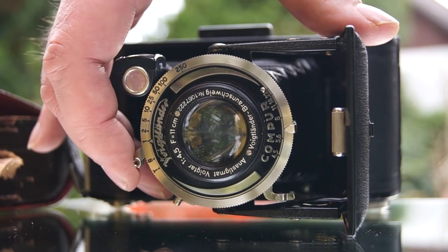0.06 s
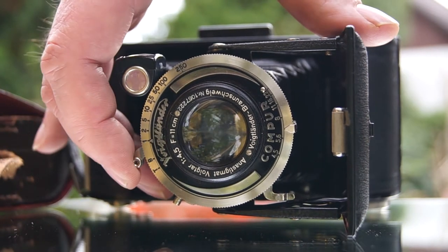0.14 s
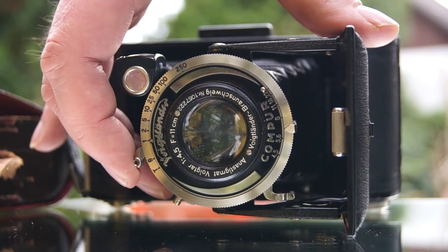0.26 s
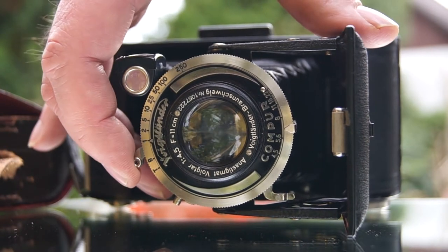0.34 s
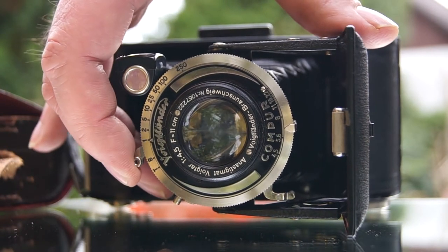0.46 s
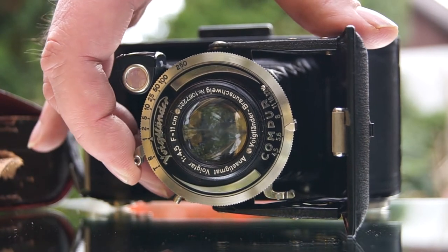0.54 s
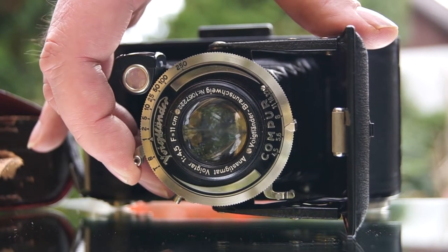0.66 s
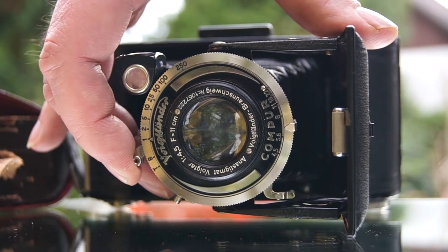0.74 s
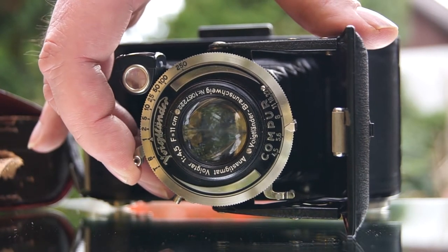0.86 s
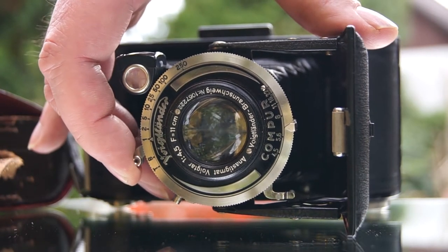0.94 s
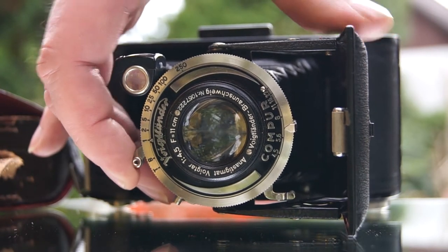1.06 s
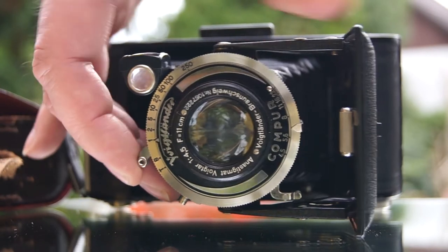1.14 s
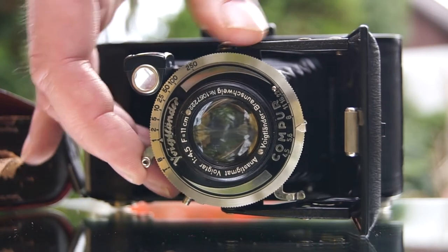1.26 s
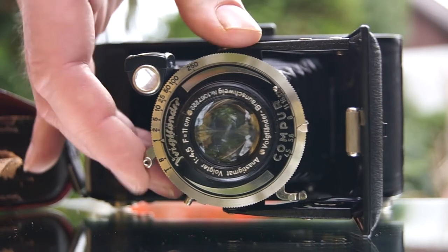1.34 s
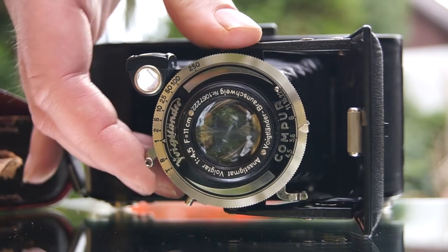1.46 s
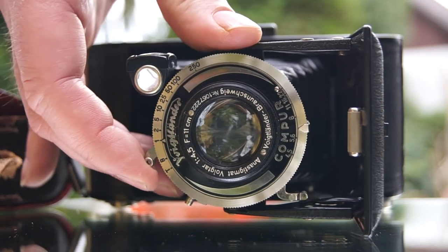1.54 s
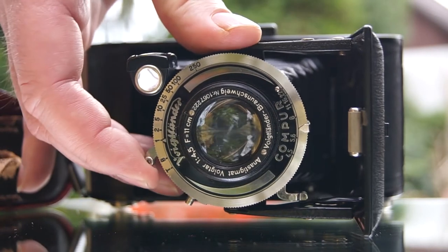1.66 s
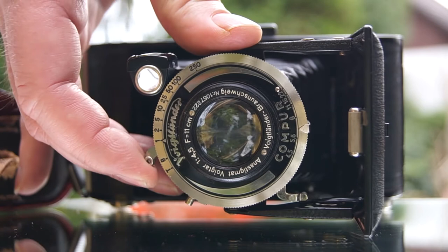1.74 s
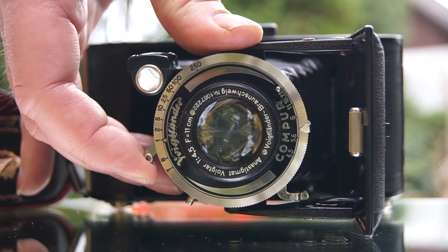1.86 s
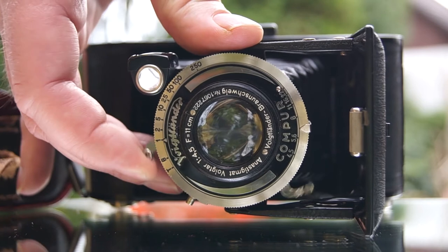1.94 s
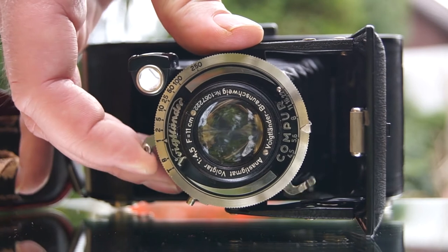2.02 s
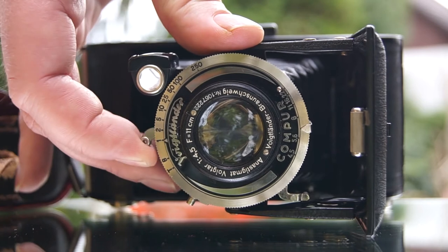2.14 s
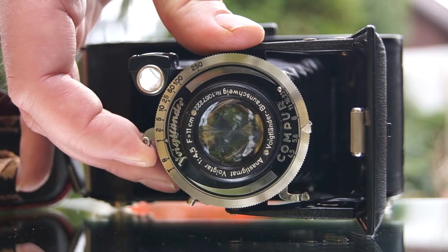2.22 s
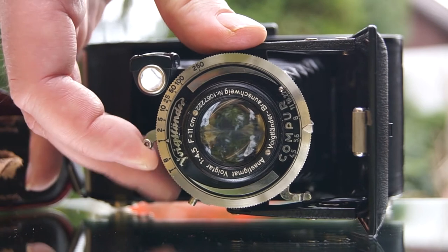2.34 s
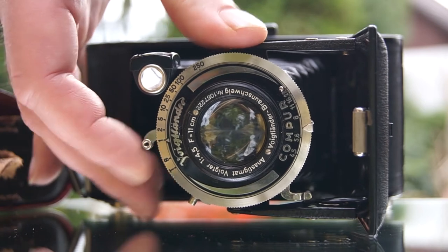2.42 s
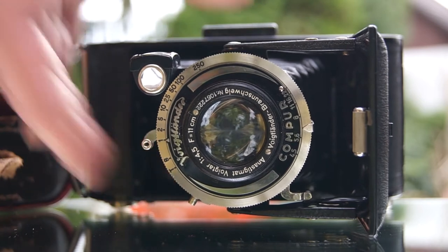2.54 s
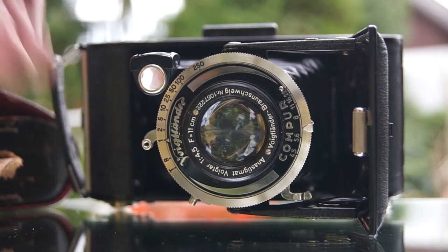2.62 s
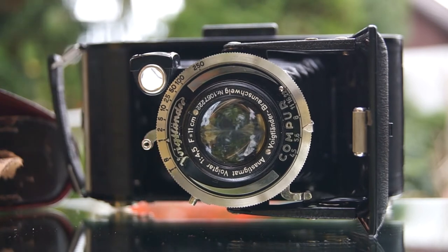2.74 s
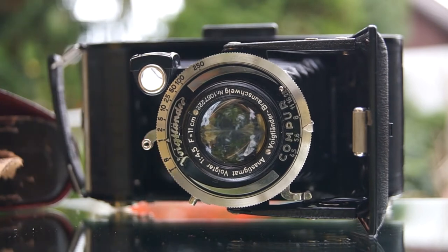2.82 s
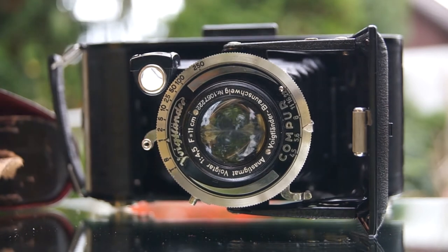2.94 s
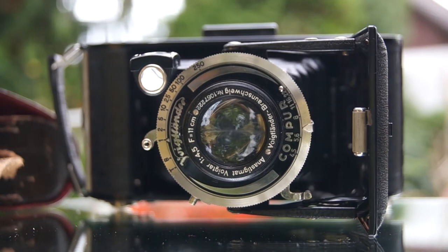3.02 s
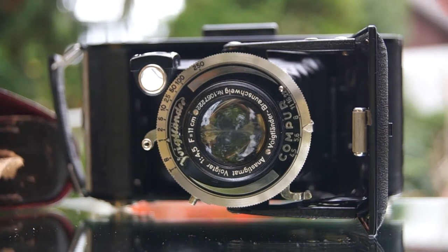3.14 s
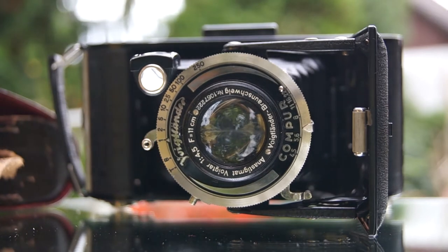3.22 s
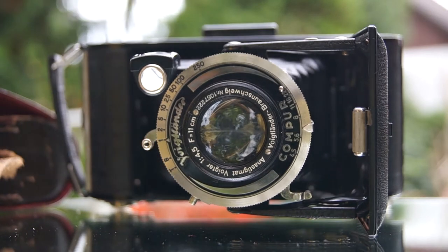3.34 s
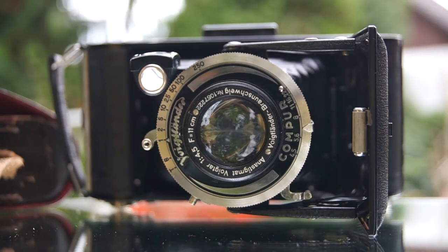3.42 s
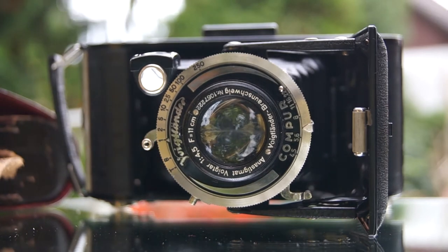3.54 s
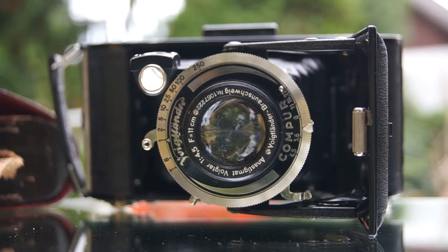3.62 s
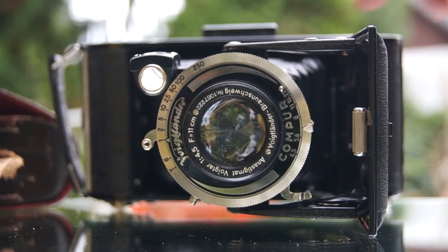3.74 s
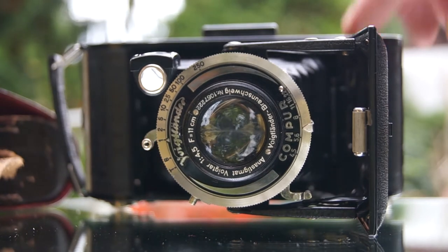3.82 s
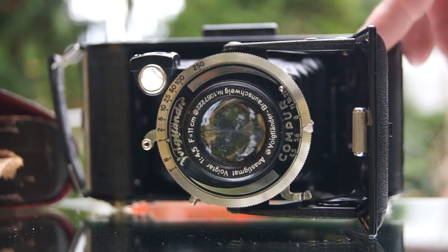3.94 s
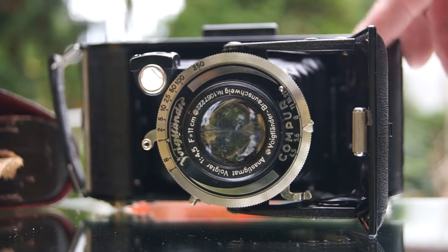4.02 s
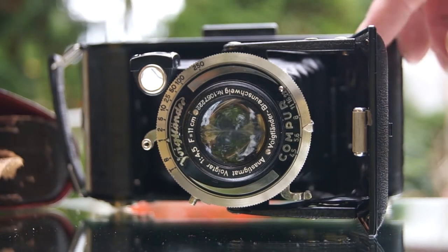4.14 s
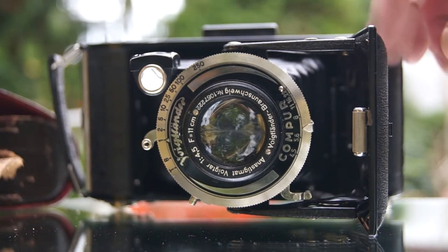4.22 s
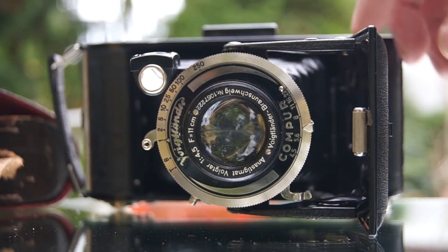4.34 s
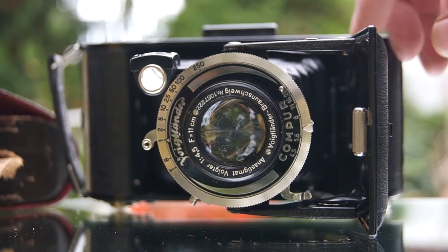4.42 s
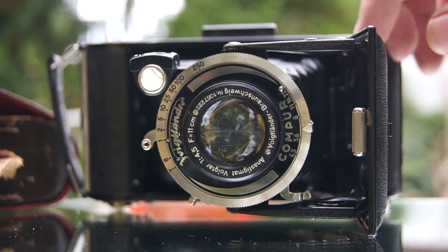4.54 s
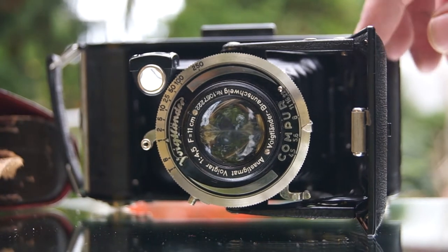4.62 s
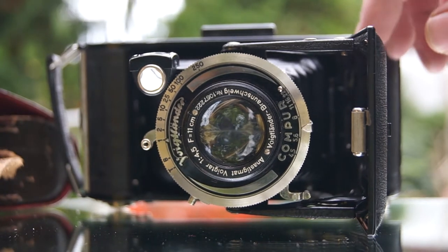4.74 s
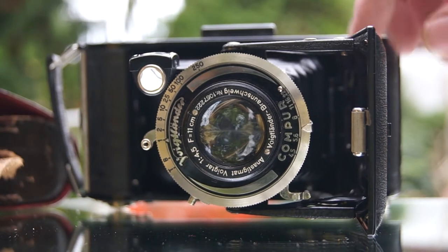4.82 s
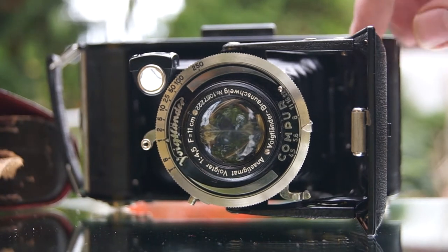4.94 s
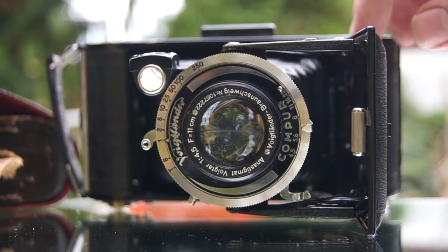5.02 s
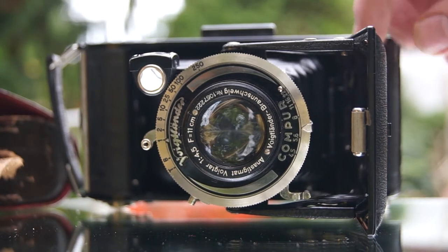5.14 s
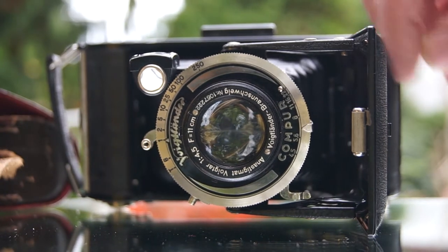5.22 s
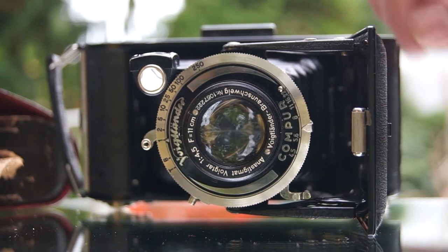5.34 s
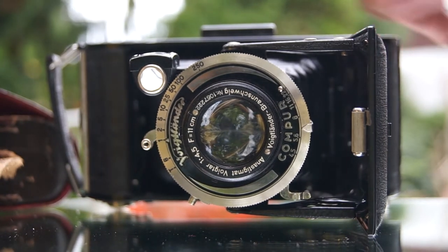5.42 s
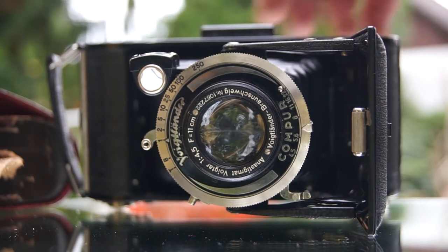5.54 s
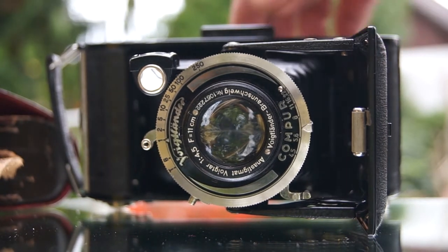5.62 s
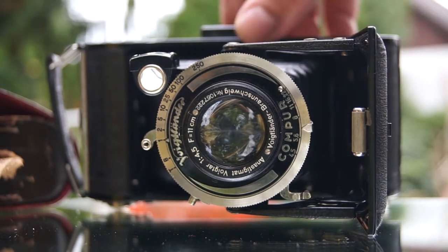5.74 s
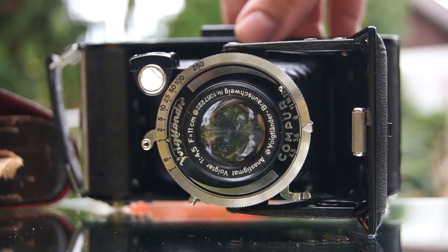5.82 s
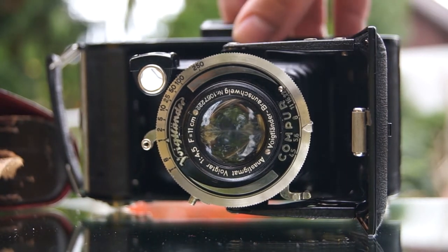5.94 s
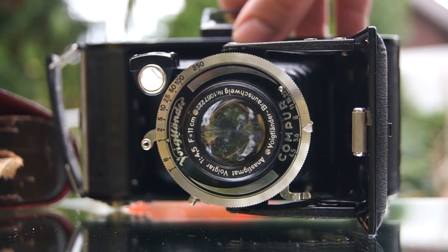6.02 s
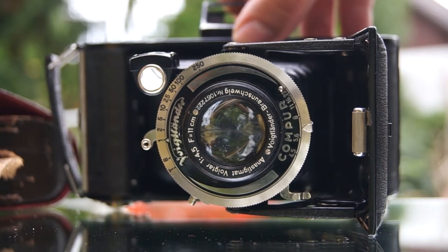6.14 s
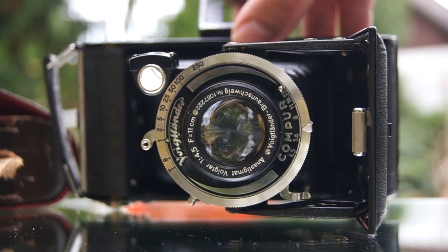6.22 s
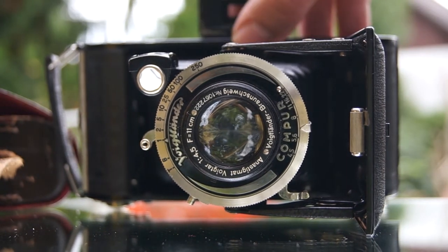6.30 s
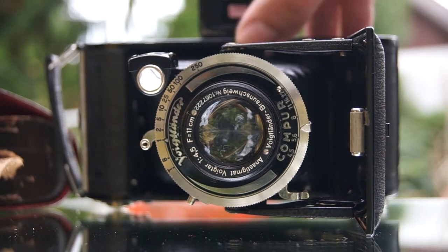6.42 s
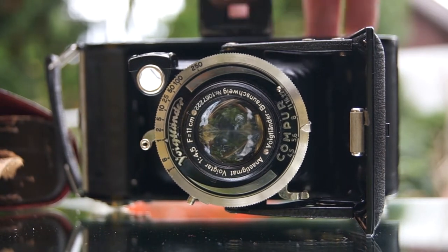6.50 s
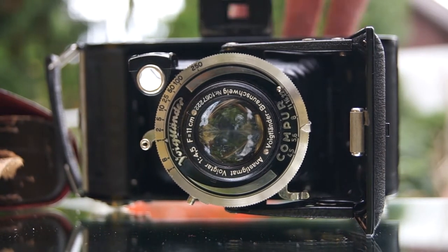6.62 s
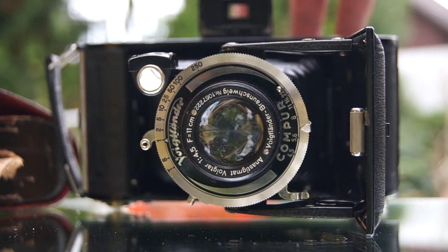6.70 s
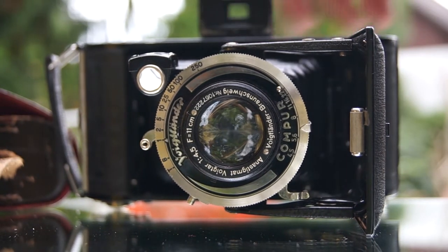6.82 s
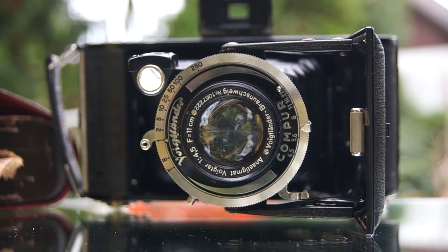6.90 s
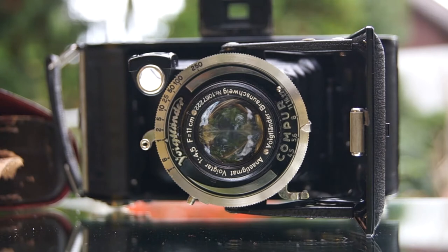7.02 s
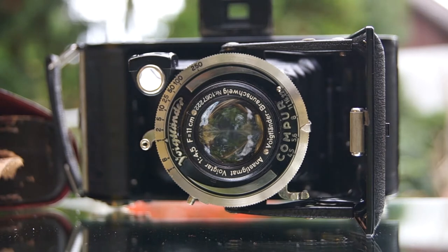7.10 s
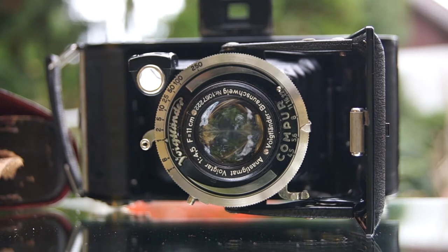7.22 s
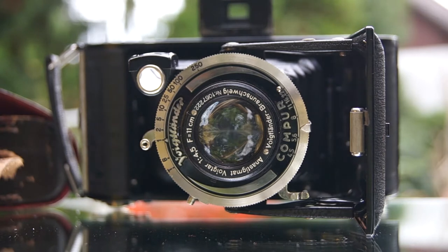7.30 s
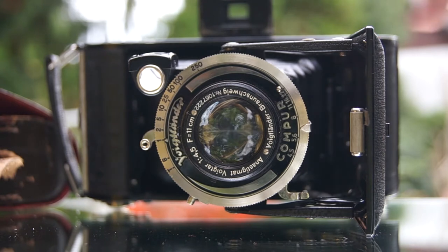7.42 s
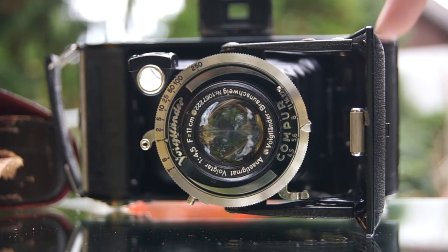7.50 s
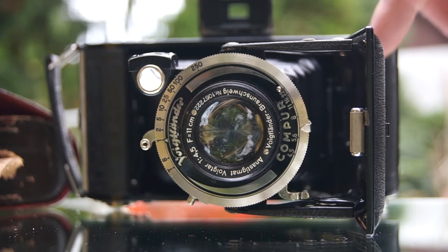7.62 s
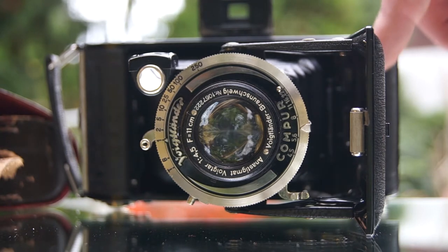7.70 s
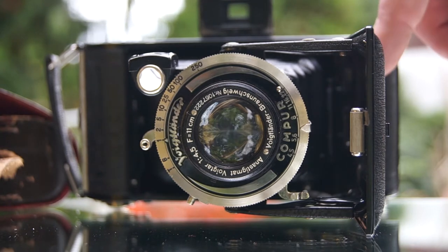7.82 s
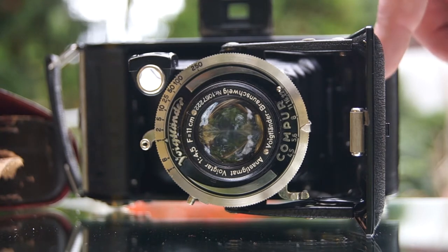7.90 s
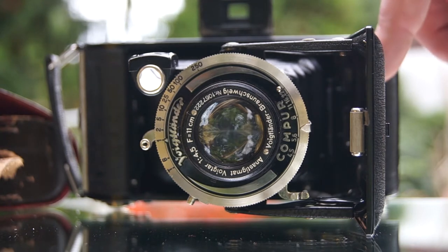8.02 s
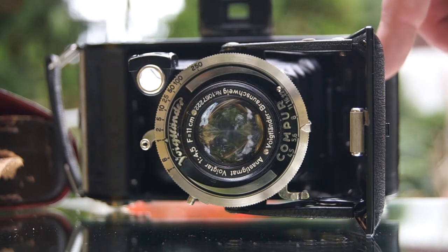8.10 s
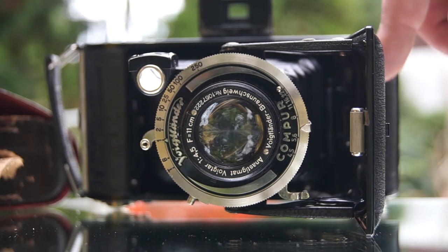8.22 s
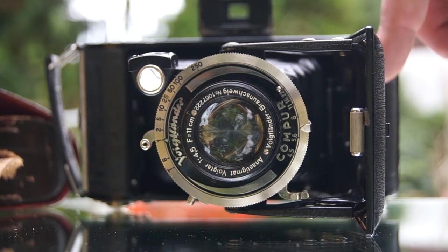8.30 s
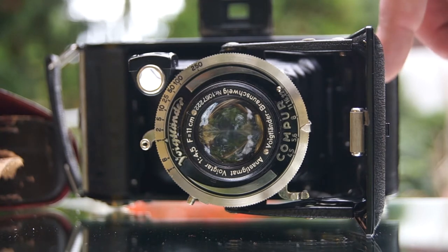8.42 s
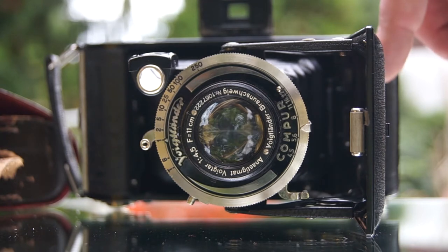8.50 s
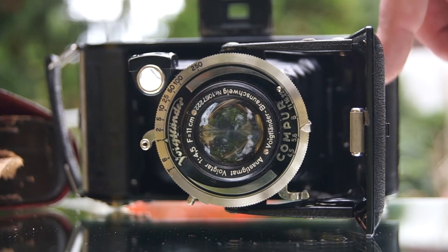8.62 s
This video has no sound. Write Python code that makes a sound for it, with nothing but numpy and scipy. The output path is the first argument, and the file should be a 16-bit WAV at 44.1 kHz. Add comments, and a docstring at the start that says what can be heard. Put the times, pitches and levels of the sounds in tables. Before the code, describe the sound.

A steady, soft, mostly low-to-mid rush of outdoor air and distant traffic runs for about 8.6 seconds, gently wavering, with a barely audible flutter of fine ticks beneath. Close by, an old folding camera is handled: a faint tick at 0.6 s and light taps around 1.3 s. At 2.15-2.2 s the lever cocks with a crisp metallic double click; a very faint, thin, high far peep follows at 2.7 s. A soft tap comes at 3.05 s, then clustered finger ticks and rubs at 3.9-4.4 s, with dull wind buffets on the right, strongest near 4 s. At 5.27 s the shutter snaps, sharp, bright and dry. Around 6.3 s the folding finder springs open with the loudest clack, hollow and metallic, rattling quickly until about 6.5 s with a faint spring ring. Then only the rush, small right-side gusts and a slight finger rub at 7.3 s remain.

```python
"""A garden table: an old folding camera is handled in the steady whirring rush of outdoor air and far traffic.
The shutter lever is cocked with a double click, fingers tap the body, the shutter snaps, and the folding finder
springs open and rattles: noise bursts crack and decaying sine modes ring. Shaped noise makes the rush and the
rubbing fingers; small gusts buffet the right microphone port. Soft ticks near 3 kHz and one thin far peep lie
beneath; narrow bands of the low rush waver irregularly in level."""
import sys
import numpy as np
from scipy import signal
from scipy.fft import rfft, irfft
from scipy.io import wavfile

SR = 44100
rng = np.random.default_rng(int(sys.argv[2]) if len(sys.argv) > 2 else 0)


def store_pcm(level_fs):
    """Save levels as 16-bit WAV."""
    pcm = np.round(np.clip(level_fs, -1, 1) * 32767).astype(np.int16)
    wavfile.write(sys.argv[1], SR, np.atleast_2d(pcm).T)


N = 381906
TIME = np.arange(N) / SR
FREQS = np.maximum(np.fft.rfftfreq(N, 1 / SR), 1)


def from_db(db):
    """Level to amplitude: 20 dB is a factor of ten."""
    return 10 ** (np.asarray(db) / 20)


def rms_one(x):
    """Normalisation: scale to unit rms, all channels together."""
    return x / np.sqrt(np.mean(x ** 2) + 1e-20)


def in_time(rows):
    """Level envelope: join (t/s, level/dB) points by straight lines."""
    s, db = np.transpose(rows)
    return np.interp(TIME, s, db)


def at_hz(points, freqs=FREQS):
    """Spectral envelope: read (f/Hz, value) points on a log-frequency axis."""
    hz, value = np.transpose(points)
    return np.interp(np.log(freqs), np.log(hz), value)


def panned(lean_db):
    """Level difference between the ports: half is added left, half is taken from the right."""
    return from_db(np.array([[0.5], [-0.5]]) * lean_db)


def white():
    """Flat-spectrum noise: spectra of two unrelated white noises."""
    return rfft(rng.standard_normal((2, N)))


def band_rms(spectrum, low_hz, high_hz):
    """Parseval's theorem: rms of the part of a sound that lies in one band."""
    inside = (FREQS > low_hz) & (FREQS < high_hz)
    energy = np.sum(np.abs(spectrum[:, inside]) ** 2, axis=1)
    return np.sqrt(2 * np.mean(energy)) / N


def bell(middle_s, half_length_s):
    """Gaussian envelope: a smooth rise and fade, 1 at its top."""
    return np.exp(-0.5 * np.minimum(((TIME - middle_s) / half_length_s) ** 2, 100))


def ripple_db(freqs):
    """Interference: reflections off table and camera carve notches and peaks at each port."""
    # f/Hz, width/Hz, left level/dB, right level/dB
    ripple_bands = [(467, 17.6, 7, 7), (600, 40, -9, -7.5), (1386, 138, -12, -9.5), (2350, 230, -9.5, -5.5),
                    (2393, 64, -14, -13), (3446, 234, -11.5, -8), (3900, 18, -8, -3), (4563, 108, -5, 11)]
    return sum(np.array([[left], [right]]) * np.exp(-((freqs - hz) / width) ** 2)
               for hz, width, left, right in ripple_bands)


def camera():
    """Coupled resonators: steel parts crack and ring; covers, body and a spring ring on beneath."""
    # modes of the thin covers: f/Hz, level/dB, T60/s, left-right level/dB
    cover_modes = [(1008, -7.5, 0.1, -5), (1130, -3.5, 0.038, -3), (1555, -6.5, 0.059, 1),
                   (1653, -1.5, 0.0069, 9), (1757, -2, 0.044, -8), (1960, -16, 0.032, 2),
                   (2106, -10, 0.04, 11)]
    # modes of the hollow body: f/Hz, level/dB, T60/s, left-right level/dB
    body_modes = [(372, -0.5, 0.065, -1), (412, 1.5, 0.068, -2), (490, -0.5, 0.067, 2), (526, 3, 0.046, 5),
                  (700, -7, 0.047, 6), (830, 0.5, 0.015, 15), (1044, 3, 0.041, 4)]
    hits, names = contacts()
    times, _, _, cover_db, body_db, _, part_hz, ring_db = hits.T
    # a part hardly excites the case above its own pitch
    cover = struck(cover_modes, times, cover_db + 0.5, part_hz, spread_db=1.0, lag_s=0.00007)
    body = struck(body_modes, times, body_db - 4.0, part_hz, spread_db=4.5, lag_s=0.00009)
    parts = steel_parts(times, ring_db, part_hz, names)
    cracks = steel(hits, part_db=-1.5, part_width_hz=740, ping_db=0.5, ping_t60=0.026, ripple_share=0.56)
    # so small a radiator gives off no bass
    small_radiator = signal.butter(2, 230, "high", fs=SR, output="sos")
    return signal.sosfilt(small_radiator, cracks + parts + cover + body + spring())


def contacts():
    """Impact excitation: snaps, taps and rebounds together, all with the columns of the snaps."""
    # spring-driven parts hit their stops: t/s, steel crack level/dB, sparkle level over the crack/dB,
    # cover clack level/dB and body thud level/dB (both before trim), crack T60/s, crack f/Hz,
    # ring level/dB, part that rings
    snap_rows = [(2.152, -42.5, 6, -58, -54, 0.011, 4450, -32, "pawl"),
                 (2.1828, -35.5, -1, -33.5, -29, 0.029, 4300, -25.5, "lever"),
                 (2.195, -57, -12, -50, -29, .018, 600, -54, "lever"),
                 (5.265, -31, -4, -26, -37, 0.043, 4300, -24.5, "shutter"),
                 (5.2716, -29, 3.5, -21, -30.5, 0.019, 3900, -26, "shutter"),
                 (5.2787, -31, -6, -24.5, -32, 0.02, 7340, -30, "shutter"),
                 (5.2802, -40, -8, -33, -28.5, .025, 2850, -28, "catch"),
                 (6.3365, -30, -11.5, -45, -54, 0.018, 3000, -35, "finder"),
                 (6.3428, -25.5, -23, -26, -28, 0.012, 2700, -18, "finder"),
                 (6.3461, -28, -13, -19, -19, 0.018, 1990, -10, "frame"),
                 (6.3498, -32.5, -4, -44, -38, 0.015, 4570, -29, "finder"),
                 (6.353, -34, -9, -30, -28, 0.018, 2680, -35, "finder"),
                 (6.386, -39.5, -7, -43, -37, 0.018, 3320, -36, "catch")]
    # fingers tap the steel fittings: # t/s, crack level/dB, sparkle level over the crack/dB, cover clack
    # level/dB (before trim), # crack f/Hz, ring level/dB, part that rings
    tap_rows = [(0.6, -52.5, -15, -53, 4050, -59, "strut"), (1.281, -49, -19, -55, 3700, -45, "clasp"),
                (1.358, -55, -26, -56, 3650, -47, "clasp"), (2.166, -60, -1, -60, 4600, -52, "pawl"),
                (2.427, -55, -4, -55, 4530, -57, "lever"), (3.045, -52, -20, -59, 3100, -49, "finder"),
                (3.058, -56, -20, -61, 3800, -60, "finder"), (3.929, -53, -9, -55, 7250, -45, "latch"),
                (3.932, -44, -19, -52, 3920, -41, "strut"), (3.935, -47, -16, -47, 6270, -42, "catch"),
                (3.939, -52, -24, -52, 2050, -41, "hinge"), (3.943, -47, -20, -48, 2900, -42, "hinge"),
                (3.947, -54, -24, -58, 2950, -40, "hinge"), (3.9516, -55, -24, -60, 4280, -48, "hinge"),
                (4.217, -57, -18, -52, 4100, -54, "strut"), (4.254, -40, -1, -50, 4740, -29.5, "latch"),
                (4.2575, -47, -16, -41, 2010, -27.5, "latch"), (4.295, -50, -20, -50, 3400, -50, "catch"),
                (4.301, -50, -14, -45, 3900, -39.5, "catch"), (4.393, -44.5, -4, -40, 4370, -35, "strut"),
                (4.398, -49, -12, -42, 3080, -43, "hinge"), (4.407, -48, -12, -41, 4130, -42, "strut"),
                (5.118, -48, -6.5, -56, 4600, -54, "lever"), (5.845, -51.5, -9, -55, 2990, -51, "finder"),
                (6.3, -48.5, -14, -50, 4200, -44, "finder"), (6.328, -41, -13, -40, 4060, -46, "finder")]
    body_over_cover_db, tap_t60_s = -5.5, 0.029   # body level before trim
    taps = [(s, db, sparkle_db, cover_db, cover_db + body_over_cover_db, tap_t60_s, hz, ring_db, part)
            for s, db, sparkle_db, cover_db, hz, ring_db, part in tap_rows]
    start_s, gap_s, count = 6.3762, 0.046, 3
    first_db, loss_db = -35.5, 3.5   # the loss applies each time the count of rebounds doubles
    sparkle_db, cover_over_crack_db = -15, -10
    rebound_hz, rebound_t60_s = 3020, 0.027
    rebounds = []
    for k in range(count):
        db = first_db - loss_db * np.log2(k + 1)
        cover_db = db + cover_over_crack_db
        rebounds.append((start_s + k * gap_s, db, sparkle_db, cover_db, cover_db + body_over_cover_db,
                         rebound_t60_s, rebound_hz, db, "finder"))   # rings at the level of its crack
    rows = list(snap_rows) + taps + rebounds
    return np.array([row[:-1] for row in rows]), np.array([row[-1] for row in rows])


def steel(hits, part_db, part_width_hz, ping_db, ping_t60, ripple_share):
    """Resonant emphasis: a contact cracks around its part's pitch and pings; a sparkle lies on top."""
    # colour of the crack: f/Hz, density level/dB per Hz
    crack_points = [(500, -21), (1000, 1.5), (2300, 0.5), (2850, 1), (3400, 1), (4200, -2.5), (5200, -4.5),
                    (6500, -6), (8000, -18), (12000, -40)]
    # colour of the sparkle: f/Hz, density level/dB per Hz
    sparkle_points = [(4500, -9.5), (6500, -3.5), (8000, -1), (9500, -5.5), (12500, -8.5), (14500, -16)]
    # the treble of the camera reaches the left port shaded: f/Hz, level/dB
    left_shade = [(3000, 1.5), (7500, 3), (8700, -4), (10000, -10), (14000, -14)]
    out, age = np.zeros((2, N)), np.arange(SR // 5) / SR
    freqs = np.maximum(np.fft.rfftfreq(len(age), 1 / SR), 1)
    left_only = np.array([[1], [0]])
    shade = from_db(at_hz(left_shade, freqs) * left_only + ripple_share * ripple_db(freqs))
    crack_colour = from_db(at_hz(crack_points, freqs)) * shade
    sparkle_colour = from_db(at_hz(sparkle_points, freqs)) * shade
    port_phase = np.array([[0], [1]])   # radians
    for s, crack_db, top_db, _, _, t60, part_hz, _ in hits:
        part = 1 + from_db(part_db) / (1 + ((freqs - part_hz) / part_width_hz) ** 2)
        burst = crack(crack_colour * part, age, t60, rise_s=0.00091, tail_db=-15.0, tail_t60=0.16)
        sparkle = crack(sparkle_colour, age, t60 * 1.03, rise_s=0.00017, tail_db=-16.0, tail_t60=0.12)
        ping = from_db(ping_db - 60 * age / ping_t60) * np.sin(2 * np.pi * part_hz * age + port_phase)
        hit = from_db(7.0) * burst + from_db(top_db + 7.5) * sparkle + ping
        start = round(s * SR)
        out[:, start:start + len(age)] += from_db(crack_db) * hit
    return out


def crack(colour, age, t60, rise_s, tail_db, tail_t60, grit_db=5):
    """Impulsive noise: tiny uneven impacts rise fast and fall quickly to a faint tail of reflections."""
    unevenness = from_db(grit_db * np.clip(rng.standard_normal(len(age)), -2, 2))
    grit = rng.standard_normal((2, len(age))) * unevenness
    noise = rms_one(irfft(rfft(grit) * colour, len(age)))
    fall = from_db(-60 * age / t60) + from_db(tail_db - 60 * age / tail_t60)
    return noise * (1 - np.exp(-age / rise_s)) * fall


def struck(modes, times, levels_db, reach_hz, spread_db, lag_s):
    """Modal superposition: a blow rings the modes below its reach, unevenly; the right port lags."""
    out, age = np.zeros((2, N)), np.arange(SR // 2) / SR
    heard = np.maximum(age - np.array([[0], [lag_s]]), 0)
    rings = []
    for k, (hz, db, t60, lean) in enumerate(modes):
        decay = from_db(db - 60 * heard / t60)
        rings.append((-1) ** k * panned(lean) * decay * np.sin(2 * np.pi * hz * heard))
    reached = 1 / (1 + (np.array(modes)[:, 0] / reach_hz[:, None]) ** 16)
    strengths = reached * from_db(spread_db * rng.standard_normal((len(times), len(modes))))
    for s, db, strength in zip(times, levels_db, strengths):
        start = round(s * SR)
        out[:, start:start + len(age)] += from_db(db) * np.tensordot(strength, np.array(rings), 1)
    return out


def steel_parts(times, ring_db, part_hz, names):
    """Free vibration: each struck steel part rings with its own damped modes."""
    # modes of the small steel parts, all with f/Hz, level/dB, T60/s, left-right level/dB
    frame_modes = [(1650, -0.5, 0.018, 5), (1840, -1.5, 0.016, 4), (2150, -17, 0.029, 4),
                   (2620, -17, .022, 6)]
    lever_modes = [(1640, -8, 0.037, 4), (2850, -16, .05, 6), (3930, 1, 0.04, 2), (4330, 1.5, .018, -4),
                   (4780, 4.5, 0.018, 0), (5650, -10, 0.036, 0), (7080, -9, .02, 2), (8100, -8, .03, -1)]
    pawl_modes = [(4130, 1, .018, 0), (4450, 0, .018, -2), (4570, -1, .018, -2), (5700, -9, .02, 0)]
    clasp_modes = [(3480, -2, .022, 0), (3800, 0, .022, 1), (4200, -5, .03, 0)]
    shutter_modes = [(2080, -7, 0.072, 5), (2810, -9, 0.074, 11), (2900, -15, 0.04, 2), (3884, 1, 0.056, 5),
                     (4450, -3, 0.05, 7), (4800, -14, 0.063, -2), (4953, -6, 0.043, 0),
                     (5240, -14, 0.063, 2), (6056, -14, .07, -2), (6450, -10, .06, 2), (6600, -4, .04, 3),
                     (7500, -6, .05, -3), (7700, -9, .06, 0)]
    latch_modes = [(990, -3, 0.086, -1), (2085, -3, 0.025, 4), (2724, -9, 0.055, -3), (3400, -9, 0.019, -8),
                   (4270, -3, 0.033, -2), (4850, 3, .014, 3), (5400, -8, .014, 0), (6000, -1, .018, 4),
                   (7330, 2, .016, 0), (7750, -3, .02, 2)]
    strut_modes = [(1700, -22, 0.045, 0), (2745, -4, 0.06, 3), (3240, -5, 0.031, 0), (4010, -1, .025, 0),
                   (4180, -2, 0.046, -2), (6100, -8, .025, 0), (7420, -10, .025, 0)]
    hinge_modes = [(2130, -6, .025, 0), (2870, -3, .035, 0), (3070, 0, .035, 0), (4440, -1, .025, 0)]
    catch_modes = [(2700, 0, .045, 1), (3320, -9, 0.032, 0), (3860, 2, 0.023, 1), (6050, -14, 0.037, 0)]
    finder_modes = [(2670, -2, 0.025, 3), (2900, -11, 0.022, -9), (4060, -8, .022, 2), (4640, -8, .024, 5),
                    (5170, -8, .03, 0)]
    modes_of = {"frame": frame_modes, "lever": lever_modes, "pawl": pawl_modes, "clasp": clasp_modes,
                "shutter": shutter_modes, "latch": latch_modes, "strut": strut_modes,
                "hinge": hinge_modes, "catch": catch_modes, "finder": finder_modes}
    out = np.zeros((2, N))
    for name, modes in modes_of.items():
        own = names == name
        out += struck(modes, times[own], ring_db[own], 1.71 * part_hz[own], spread_db=2, lag_s=0.00005)
    return out


def spring():
    """Beating: a spring set ringing sounds close modes together."""
    # close modes of the spring: f/Hz, level/dB, T60/s, left-right level/dB
    spring_modes = [(3895, -0.5, 0.17, 5), (3965, -9, .13, 2), (4200, -4, .1, -2)]
    # the spring is set ringing: t/s, level/dB
    twang_rows = [(1.281, -50), (2.1828, -55), (5.265, -51), (6.155, -54), (6.3, -46.5), (6.3426, -42),
                  (6.386, -44), (6.423, -48), (6.468, -47), (6.588, -55)]
    times, levels_db = np.transpose(twang_rows)
    no_limit = np.full(len(times), np.inf)
    return struck(spring_modes, times, levels_db, no_limit, spread_db=4.5, lag_s=0.00005)


def fingers():
    """Friction noise: skin sliding on the camera gives short soft swishes."""
    # fingertips slide: middle t/s, half length/s, level/dB, f/Hz, width/Hz, left-right level/dB
    rub_rows = [(3.05, 0.011, -51, 3320, 900, -4), (3.796, .1, -70, 5470, 2000, -7),
                (3.944, 0.012, -54, 3900, 1300, 0), (5.01, 0.032, -62, 5400, 600, 5),
                (5.223, 0.028, -56.5, 5300, 750, 8), (7.331, .11, -62, 4000, 900, -5)]
    out, age = np.zeros((2, N)), np.arange(-SR // 2, SR // 2) / SR
    freqs = np.fft.rfftfreq(len(age), 1 / SR)
    for s, length, db, hz, width, lean in rub_rows:
        noise = rfft(rng.standard_normal((2, len(age))))
        swish = rms_one(irfft(noise / (1 + ((freqs - hz) / width) ** 4), len(age)))
        start = round((s + age[0]) * SR)
        envelope = np.exp(-0.5 * (age / length) ** 2)
        out[:, start:start + len(age)] += from_db(db) * panned(lean) * envelope * swish
    return out


def ticking(per_s, level_db, tick_hz, width_hz, spread_db):
    """Resonator under random impulses: a very faint, uneven flutter of soft ticks."""
    times = np.cumsum(rng.gamma(3, 1 / (3 * per_s), size=1500))
    at = (times[times < TIME[-1]] * SR).astype(int)
    strengths = from_db(spread_db * rng.uniform(-0.91, 1, (2, len(at))))
    clicks = np.zeros((2, N))
    clicks[:, at] = strengths * rng.choice([-1, 1], (2, len(at)))
    r = np.exp(-np.pi * width_hz / SR)   # pole radius
    ring = [1, -2 * r * np.cos(2 * np.pi * tick_hz / SR), r * r]
    ticks = signal.lfilter([1, 0, -1], np.convolve(ring, ring), clicks + 1e-18)
    return from_db(level_db) * rms_one(ticks)


def wind(leak_db):
    """Turbulent pressure: gusts flutter on the right port and shed eddies, each one swing up and down."""
    # gusts: middle t/s, half length/s, flutter level/dB
    gust_rows = [(3.783, 0.047, -36.5), (4.044, 0.085, -44), (4.6, 0.19, -51), (4.894, 0.065, -41),
                 (5.2, 0.024, -42), (5.498, 0.05, -38.5), (6.95, 0.041, -41.5), (7.282, 0.039, -46),
                 (7.522, 0.057, -41.5), (7.864, 0.11, -48)]
    # the hardest single buffets, and at 3.948 s a tap's dull body thud: t/s, peak level/dB
    puff_rows = [(3.82, -21.5), (3.836, -25), (3.871, -19), (3.948, -22), (3.9842, -15), (4.0285, -23),
                 (4.0409, -25), (4.056, -25), (4.062, -11), (4.1091, -21), (4.123, -26), (4.8447, -21.5),
                 (4.8647, -23), (5.4842, -20.5), (7.5572, -20.5)]
    # colour of the flutter: f/Hz, density level/dB per Hz
    flutter_points = [(25, -10), (60, -6.5), (100, -11.5), (170, 4), (330, -1), (500, -16), (900, -40),
                      (2000, -54)]
    # colour of a buffet: f/Hz, density level/dB per Hz
    buffet_points = [(20, -42), (120, -19.5), (250, 1.5), (430, 2), (530, -4.5), (640, -14), (1100, -16.5),
                     (1600, -52), (5000, -95)]
    eddies_per_s, eddy_db, eddy_spread_db = 55, 9, 2   # eddy peak over the flutter
    force = sum(from_db(db) * bell(s, half_length) for s, half_length, db in gust_rows)
    flutter = force * rms_one(irfft(white()[0] * from_db(at_hz(flutter_points)), N))
    eddies = (rng.random(N) < eddies_per_s / SR) * force
    eddies = eddies * from_db(eddy_db + eddy_spread_db * rng.uniform(-1, 1, N))
    for s, db in puff_rows:
        eddies[round(s * SR)] += from_db(db)
    swing = 1j * from_db(at_hz(buffet_points))   # an imaginary spectrum is odd in time
    buffets = irfft(rfft(eddies) * swing, N) / irfft(swing, N).max()
    return (flutter + buffets) * from_db([[leak_db], [0]])


def peep():
    """Frequency modulation: one faint, thin far note slides up, settles on its pitch and wavers in level."""
    middle_s, half_length_s, level_db = 2.729, 0.027, -62
    final_hz, slide_hz, slide_s = 7320, 650, 0.014   # span and time of the slide up
    waver_db, flutter_hz = 2.5, 50   # depth and speed of the waver
    hz = final_hz - slide_hz / 2 * (1 - np.tanh((TIME - middle_s + half_length_s) / slide_s))
    waver = rms_one(irfft(white()[0] / (1 + (FREQS / flutter_hz) ** 4), N))
    note = np.sin(2 * np.pi * np.cumsum(hz) / SR)
    return from_db(level_db + waver_db * waver) * bell(middle_s, half_length_s) * note


def rush_wavers():
    """Narrow-band noise: narrow bands of the low rush waver irregularly in level, alike at both ports."""
    # chance strong moments of the noise: middle t/s, half length/s, level/dB, f/Hz
    waver_rows = [(.48, 0.047, -38.5, 485), (0.912, .07, -41.5, 310), (2.63, .08, -41.5, 326),
                  (3.314, .05, -47, 710), (3.719, 0.015, -34, 403), (5.146, 0.052, -43.5, 455),
                  (6.19, 0.084, -42.5, 475), (6.65, 0.053, -40.5, 334), (7.56, 0.12, -47, 456),
                  (8.247, 0.14, -46, 707), (8.276, 0.094, -45, 364)]
    width_hz = 48
    noise = white()[0]
    out = np.zeros(N)
    for s, half_length, db, hz in waver_rows:
        band = rms_one(irfft(noise / (1 + ((FREQS - hz) / width_hz) ** 4), N))
        out += from_db(db) * bell(s, half_length) * band
    return out


def outdoors():
    """Diffuse-field coherence: far noise, alike at both ports in the bass; three bands vary separately."""
    # the outdoor rush: f/Hz, density level/dB per Hz
    air_points = [(20, -34), (42, -19.5), (58, -16.5), (95, -26), (140, -15.5), (200, -9), (310, -1.5),
                  (420, -1), (720, -1), (1030, -2), (1700, -14.5), (2900, -26), (4300, -29.5),
                  (7000, -36.5), (10000, -44.5), (14500, -51)]
    # likeness of the ports (clipped to 1 below): f/Hz, correlation
    likeness_points = [(60, 1), (160, 0.97), (300, 1.02), (500, 0.88), (750, 0.74), (1200, 0.65), (2000, 0),
                       (3200, 0.09), (5000, 0)]
    # balance of the ports: f/Hz, left-right level/dB
    lean_points = [(50, 1), (160, 0), (350, -0.4), (1100, -1), (3000, 1.5), (8000, 1), (13000, -2)]
    # far rumble: t/s, level/dB before the band's gain
    rumble_rows = [(0.0, -42.5), (0.4, -38.5), (0.65, -39), (0.96, -40.5), (1.25, -42.5), (1.75, -42),
                   (2.28, -42.0), (2.46, -42), (2.64, -41), (2.94, -42.5), (3.12, -41.5), (3.42, -46.0),
                   (3.66, -42.5), (3.95, -43.5), (4.25, -47.5), (4.5, -48), (5.1, -43), (5.35, -45),
                   (5.75, -44), (6.0, -44.5), (6.48, -40.5), (6.66, -40.5), (6.9, -44), (7.44, -40.5),
                   (7.92, -44), (8.22, -43), (8.64, -45)]
    # middle of the rush: t/s, level/dB before the band's gain
    rush_rows = [(0.0, -44.0), (0.66, -42.5), (1.62, -44.0), (3.3, -42.5), (4.14, -45.5), (4.38, -45),
                 (4.5, -46.0), (5.64, -43.5), (6.12, -44), (6.48, -41.5), (7.2, -45.0), (8.04, -44.0),
                 (8.28, -41.5), (8.64, -45.5)]
    # near hiss: t/s, level/dB before the band's gain
    hiss_rows = [(0.0, -64), (3.37, -63.5), (4.99, -63), (8.2, -63), (8.66, -63.5)]
    mid, side = white()
    alike = np.clip(at_hz(likeness_points), -1, 1)
    air = np.sqrt(1 + alike) * mid + np.sqrt(1 - alike) * side * [[1], [-1]]
    air = air * from_db(at_hz(air_points) + ripple_db(FREQS)) * panned(at_hz(lean_points))
    low = 1 / (1 + (FREQS / 560) ** 6)
    high = 1 / (1 + (2400 / FREQS) ** 6)
    # level/dB, share of the spectrum, reference band from f/Hz to f/Hz
    bands = [(in_time(rumble_rows) + 0.88, low, 120, 520),
             (in_time(rush_rows) + 0.5, 1 - low - high, 600, 2000),
             (in_time(hiss_rows) + 2.5, high, 3500, 9000)]
    return sum(from_db(db) * irfft(air * share, N) / band_rms(air, low_hz, high_hz)
               for db, share, low_hz, high_hz in bands)


def scene():
    """Superposition: the camera close by, the garden all around."""
    close = camera() + fingers() + ticking(per_s=80, level_db=-66.0, tick_hz=2998, width_hz=250, spread_db=6.0)
    return close + outdoors() + rush_wavers() + wind(leak_db=-21) + peep()


def record(dry):
    """Band limiting: the top is cut steeply; the converter sits slightly off zero."""
    cutoff_hz, converter_offset = 14300, -0.0025   # offset as a fraction of full scale
    steep_cut = signal.ellip(10, 0.1, 70, cutoff_hz, fs=SR, output="sos")
    return signal.sosfilt(steep_cut, dry) + converter_offset


dry = scene()
out = record(dry)
store_pcm(out)
```